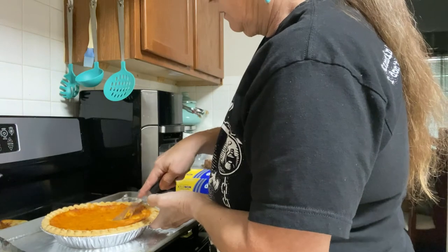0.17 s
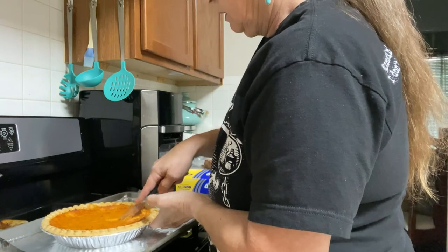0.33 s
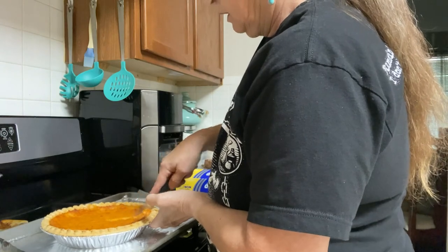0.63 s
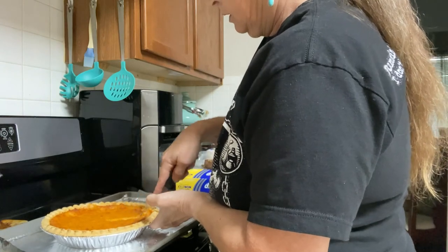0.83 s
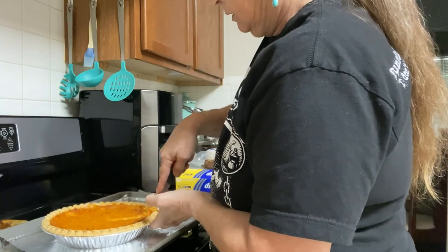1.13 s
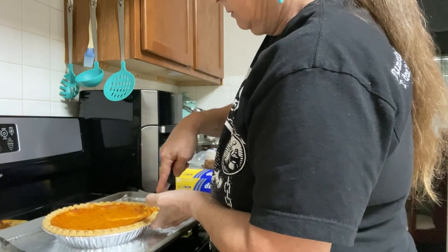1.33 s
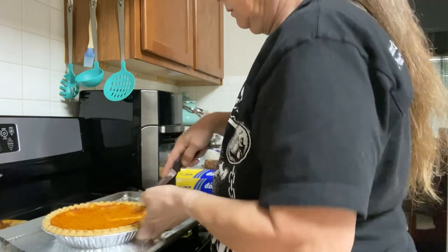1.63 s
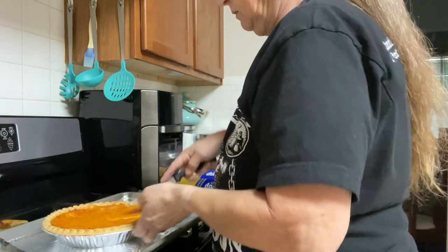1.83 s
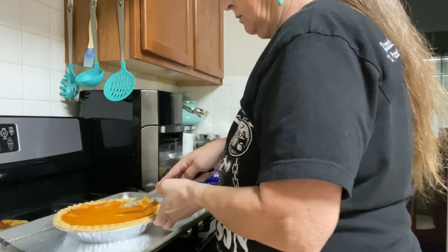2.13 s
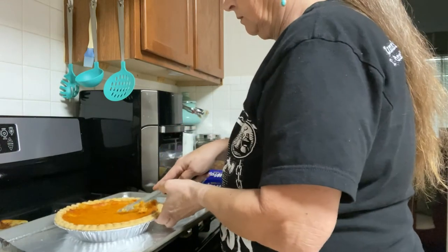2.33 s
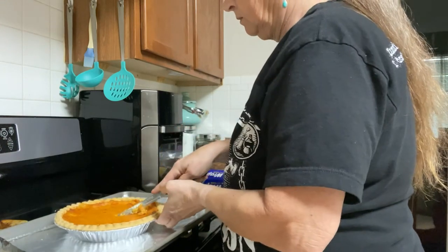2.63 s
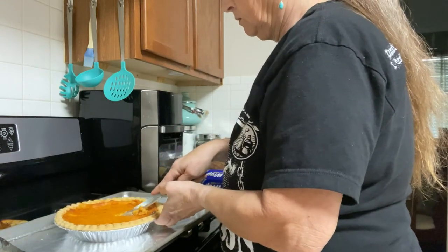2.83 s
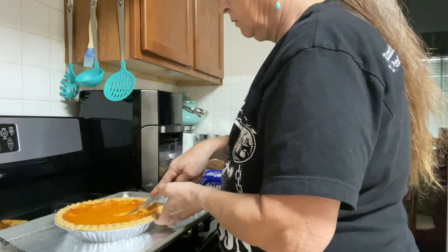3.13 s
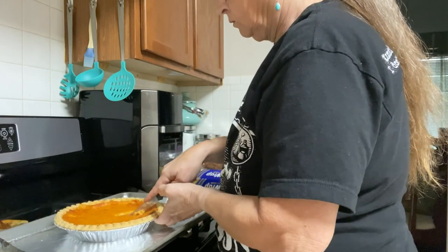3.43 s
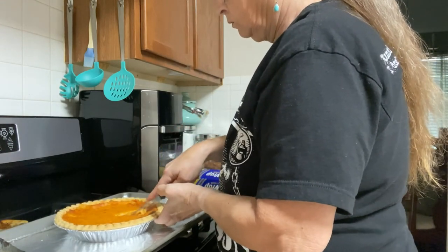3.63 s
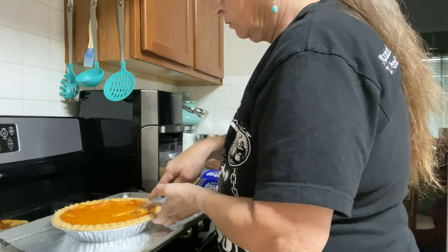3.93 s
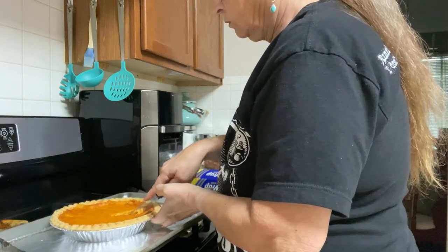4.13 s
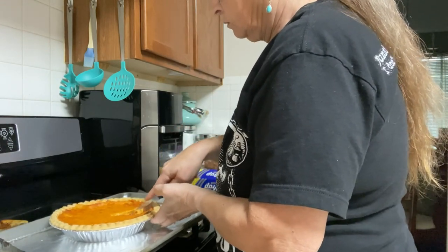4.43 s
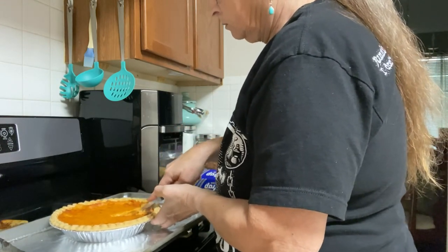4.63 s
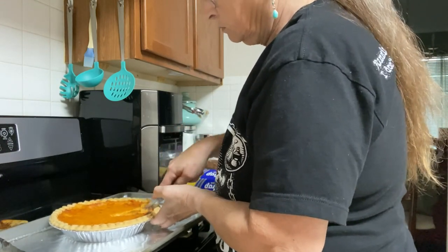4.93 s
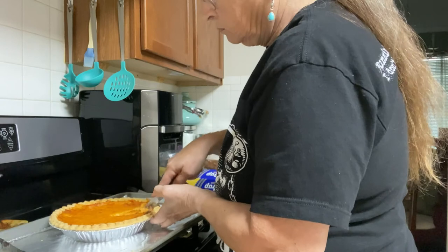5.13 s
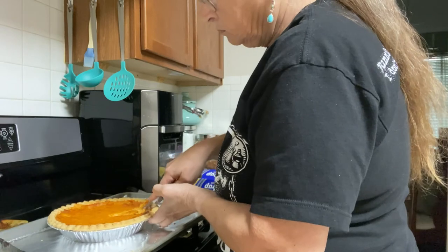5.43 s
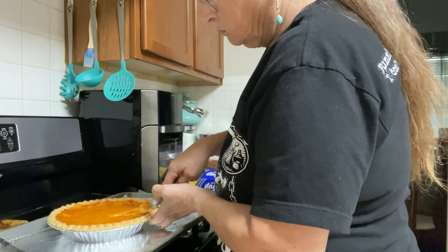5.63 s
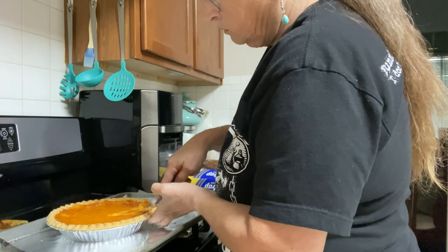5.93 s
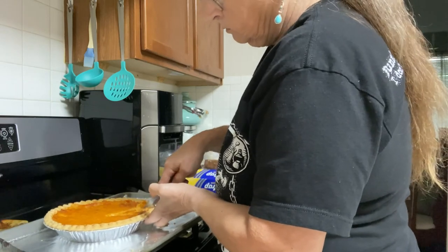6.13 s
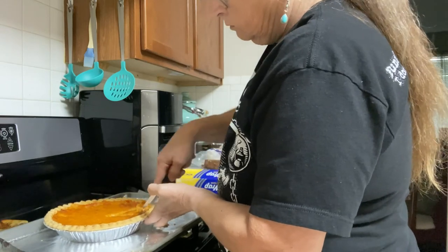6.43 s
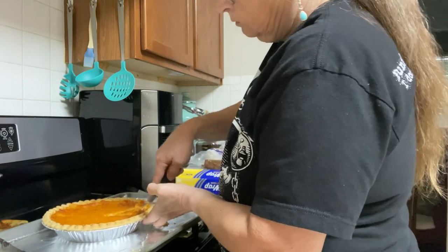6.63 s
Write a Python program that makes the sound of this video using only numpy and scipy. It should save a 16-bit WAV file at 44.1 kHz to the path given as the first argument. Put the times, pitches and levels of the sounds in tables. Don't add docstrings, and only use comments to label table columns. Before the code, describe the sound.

Close in a small hard-walled kitchen, a knife works through pie crust in a thin foil tin. Faint ticks give way to taps, then a busy crackling scrape near one and a half seconds. After a quieter stretch, separate knocks return, growing into the loudest cluster of snaps, pings and hollow pan thuds between five and six seconds. The tray bumps below; soft hum and hiss remain. Stereo phone at arm's length.

```python
import sys
import numpy as np
from scipy import signal
from scipy.fft import rfft, irfft
from scipy.io import wavfile
from scipy.ndimage import uniform_filter1d

SR = 44100
rng = np.random.default_rng(int(sys.argv[2]) if len(sys.argv) > 2 else 0)


def gain_from_db(level_db):
    decades = np.asarray(level_db, float) / 20
    return 10 ** decades


def unload_wav(signal):
    wavfile.write(
        sys.argv[1],
        SR,
        np.round(np.clip(np.atleast_2d(signal).T, -1, 1) * 32767).astype(np.int16),
    )


N = 299356

# multiple of the pitch [ratio], level/dB
DENT_OVERTONES = [(0.721, -14.5), (0.999, 0), (1.37, -9.5), (1.83, -15.5)]


def noise(*shape):
    return rng.standard_normal(shape)


def unit(x):
    return x / np.sqrt(np.mean(x ** 2))


def read(table, hz):
    f, v = np.transpose(table)
    return np.interp(np.log(hz + 1), np.log(f), v)


def band(x, lo_hz, hi_hz):
    return signal.sosfilt(signal.butter(2, [lo_hz, min(hi_hz, .45 * SR)], "bandpass", fs=SR, output="sos"), x)


def ring(x, modes):
    return sum(gain_from_db(db) / np.sqrt(w) * signal.lfilter(*signal.iirpeak(f, f / w, SR), x) for f, w, db in modes)


def convolve(x, h):
    return signal.fftconvolve(x, h, axes=-1)[..., :N]


def walk(rate):
    k = int(SR / rate)
    return unit(uniform_filter1d(uniform_filter1d(np.repeat(noise(N // k + 1), k), k), k)[:N])


def snaps(spread_db):
    return unit(noise(2, N) * uniform_filter1d(gain_from_db(spread_db * np.minimum(rng.exponential(size=N), 5)), size=12))


def dents(events, overtones, gain_db, rise_s, cycles):
    out, t = np.zeros((2, N)), np.arange(4000) / SR
    for at, db, hz in events:
        i = int(at * SR)
        tone = sum(gain_from_db(d) * np.exp((2j * np.pi - 1 / cycles) * min(k * hz, 15000) * t) for k, d in overtones)
        tone = gain_from_db(db + gain_db) * tone * (1 - np.exp(-t / rise_s))
        out[:, i:i + len(t)] += np.array([tone.imag, tone.real])[:, :N - i]
    return out


def blows():
    # t/s, peak level/dB, pan body/dB, ping f/Hz
    knocks = [(.3171, -62.5, -1.5, 3330), (0.4905, -44.5, -8, 2370), (0.7533, -55.5, -2, 3280),
              (0.7694, -32.5, 2.5, 2050), (0.863, -57, 16, 1670), (0.9114, -58.5, 12, 1530),
              (1.767, -40, 9, 1620), (1.904, -45, 7, 3750), (2.4741, -46.5, 4.5, 1500),
              (3.474, -38.5, 3, 2320), (3.589, -43.5, -2.5, 3760), (3.6852, -53.5, -6, 1480),
              (3.93, -50, 0.5, 2320), (4.038, -45.5, 3, 1380), (4.3161, -28, -17, 1564),
              (4.6703, -56, 15.5, 1560), (4.772, -67, 14, 1800), (5.0578, -26.5, -0.5, 3700),
              (5.162, -54, 13, 1830), (5.1967, -40.5, -5.5, 2270), (5.273, -52, 7.5, 1780),
              (5.4544, -67, -10, 1540), (5.7993, -33.5, -9, 3660), (5.8876, -41.5, 3, 1750),
              (6.041, -43, 2.5, 1740), (6.0467, -36.5, 5, 1850), (6.212, -55.5, 16.5, 2360),
              (6.439, -54, 0, 3100), (6.451, -53.5, 14, 1520)]
    # t/s, peak level/dB, pan body/dB, ping f/Hz
    pops = [(0.0515, -74.5, 18.5, 1730), (.594, -72, 5, 2300), (0.875, -45, -4, 3300),
            (1.3912, -79, -12, 2610), (1.6634, -31, 5.5, 3300), (1.8334, -44, -2, 1500),
            (2.1156, -38.5, -7, 2050), (2.648, -64, 11.5, 1940), (3.2955, -67, -8, 3260),
            (3.65, -54, -7, 2350), (3.9, -78, 23, 1530), (4.2652, -67, -2, 3670), (4.725, -43.5, 7, 2100),
            (4.839, -77, 24, 1490), (5.34, -41, 8.5, 1520), (5.4337, -45.5, 5.5, 1580),
            (5.8447, -40, 7, 3720), (5.951, -48, 13, 4740), (6.702, -66, 10, 2000)]
    # t/s, peak level/dB, pan body/dB, sizzle/dB, ping f/Hz
    ticks = [(0.418, -33.5, 0, -14.5, 1550), (.103, -80, -9, 6, 9300), (.2029, -72, -10, 8.5, 7360),
             (0.248, -82, -19, 19.5, 6800), (0.279, -69, -10, 8, 8800), (1.275, -60.5, 5, -8, 3220),
             (1.476, -63, -11, -9, 3830), (1.5533, -29, 5, -9.5, 2040), (1.621, -49, 13, -1, 1640),
             (1.9194, -35.5, 1, -0.5, 2090), (3.765, -38.5, 1, -11, 1517), (4.308, -48, -16, -5, 7000),
             (4.3148, -34, 7, -2, 7980), (4.816, -75, -13, 6.5, 8650), (4.9476, -51.5, 1, -5, 7840),
             (4.9737, -50.5, -5, -3.5, 1510), (4.9992, -30.5, -2, -5.5, 1520), (5.108, -33, 1.5, -6, 3800),
             (5.4128, -48, -11, -2, 8200), (5.668, -58, -31, 1.5, 4100), (5.747, -26.5, 2.7, -5.5, 3740),
             (6.361, -59.5, 14.5, 6.5, 1550), (6.405, -55, -10, 1, 1980), (6.639, -73, 15, 10.5, 7970)]
    # t/s, peak level/dB, pan body/dB, sizzle/dB, shower length/ms
    crushes = [(.387, -66, -22, -11, 66), (1.4214, -66.5, -16, -10.5, 71), (1.497, -64.5, 6, 2.5, 33),
               (1.5265, -61, 6, 8, 18), (1.605, -45.5, 10, -1, 15.7), (3.3393, -81.5, -6, 10, 28),
               (3.371, -39.5, -5, -8, 14.7), (3.71, -45, 4, -20, 13.7), (4.612, -50, -9, -10, 25),
               (5.6974, -29.5, 1, -16, 10.2), (6.0815, -35, 3, -13.5, 23)]
    taps = [(at, db, body_db, -13, hz, 7.7) for at, db, body_db, hz in knocks]
    taps += [(at, db, body_db, -17, hz, 6.45) for at, db, body_db, hz in pops]
    taps += [(*row, 6.14) for row in ticks]
    taps += [(*row, 4520, ms) for *row, ms in crushes]
    return taps


def tap_showers(taps):
    force, t = np.zeros((3, N)), np.arange(5000) / SR
    for at, db, body_db, sizzle_db, _, ms in taps:
        i = int(at * SR)
        shower = np.exp(-t / (ms / 1000)) * (1 - np.exp(-t / 0.0018))
        late = shower ** 0.62 * (1 - np.exp(-t / 0.0052))
        body, sizzle = gain_from_db(body_db - 1.0) * late, gain_from_db(sizzle_db + 5.5) * shower ** 1.25
        force[:, i:i + len(t)] += (gain_from_db(db - 2.5) * np.array([shower, body, sizzle]))[:, :N - i]
    return force


def dent_pings(taps):
    pings, t = np.zeros((2, N)), np.arange(5000) / SR
    ring_s, ping_db = 0.0045, -8
    weight = np.array([[1], [.45], [.45], [.45]])
    for at, db, _, _, hz, _ in taps:
        i = int(at * SR)
        tones = np.vstack([[[hz]], 1300 * 4.2 ** rng.random((3, 1))])
        phase = rng.random((2, 4, 1))
        chord = (weight * np.sin(2 * np.pi * (tones * t + phase))).sum(axis=1)
        pings[:, i:i + len(t)] += gain_from_db(db + ping_db) * (np.exp(-t / ring_s) * chord)[:, :N - i]
    return pings


def swell(t, start, hold, rise_db_s, fall_db_s):
    return gain_from_db(-rise_db_s * np.clip(start - t, 0, 1) - fall_db_s * np.clip(t - start - hold, 0, 1))


def contact():
    # start t/s, hold/s, rustle level/dB, pan body/dB, sizzle/dB
    slides = [(1.41, .05, -82, -7, -5), (1.49, .04, -67.5, -1, -10), (1.57, 0.083, -56, -25, 4),
              (1.94, 0.011, -47, -3.5, -12), (1.99, 0.093, -55, 0, -3), (2.09, 0.1, -56, 2, 0),
              (2.2, 0.095, -61.5, 1, -4.5), (2.42, 0.03, -81, 7, 0), (2.995, 0.014, -103, -7, 14),
              (.29, 0.028, -97, -5, 10), (3.32, 0.045, -81, -7, -23), (3.44, .02, -70, -6, -5),
              (3.76, 0.0055, -56.5, 0.5, -2), (4.09, 0.0038, -61.5, 6, -1), (4.33, 0.082, -61.5, -0.5, -6),
              (4.5, 0.067, -80.5, 1, 2), (5.21, 0.036, -73, -2, 1), (5.28, 0.11, -67, 0.5, -12),
              (5.42, 0.095, -71.5, 8.5, 3.5), (5.55, 0.013, -79, 16, 3), (6.22, 0.028, -69, 2.5, -2.5),
              (6.33, 0.088, -73.5, 8.5, 1.5), (6.5, 0.066, -65, 1, -2.5)]
    # start t/s, hold/s, rustle level/dB, pan body/dB, sizzle/dB
    presses = [(.004, 0.0096, -81, 9.5, -6), (.055, 0.019, -90, 2, -18), (2.5, 0.031, -94, -2, -24),
               (3.1, .02, -100, -13, -6), (3.17, .02, -101, -10, 0), (.65, 0.03, -90, 6, -4),
               (.31, .01, -87, 3, -3), (.43, 0.12, -70.5, 14.5, -15), (.54, 0.12, -70, 8, -4.5),
               (.79, 0.056, -73, 6.5, -1), (.87, 0.078, -69, 5, -13.5), (.99, 0.044, -85, 14.5, 5),
               (1.29, .01, -92, 2.9, -9), (1.71, 0.012, -54, 3.5, -4.5), (1.8, 0.28, -70.5, 12, 7),
               (2.66, 0.0098, -104, -13, 4), (3.56, 0.16, -82, 20.5, -5), (3.9, 0.13, -78.5, 12.5, -1),
               (4.05, 0.0096, -66, -5.5, -20), (4.64, 0.038, -70.5, 13.5, -4), (4.74, 0.04, -86, 23, 6),
               (4.86, 0.078, -91, 21.5, 1), (5.0, 0.017, -67.5, 11.5, -12), (5.11, 0.0088, -66.5, 18, -14),
               (5.7, 0.063, -66, 14.5, -15), (5.85, 0.056, -71, 15.5, 5.5), (5.95, 0.043, -69, 8, -4.5),
               (6.03, 0.12, -64.5, 5.5, 1), (6.47, 0.025, -69.5, 11, 1), (6.655, .02, -81, 12, 3),
               (6.71, 0.014, -73.5, 6.8, -2)]
    # start t/s, hold/s, level/dB
    shoves = [(0.006, 0.02, -55), (0.452, 0.032, -42.5), (0.54, 0.066, -54.5), (0.795, 0.022, -48.5),
              (1.295, 0.008, -71), (1.587, 0.019, -48.5), (1.712, 0.067, -45), (1.937, 0.04, -46),
              (2.032, 0.12, -54.5), (2.4, 0.021, -58), (2.726, 0.027, -66), (2.858, .01, -84),
              (3.398, .01, -54), (3.498, 0.0084, -44), (3.627, 0.17, -50.5), (3.966, 0.13, -52),
              (4.252, 0.0063, -55), (4.373, 0.019, -55), (4.695, 0.015, -49.5), (5.007, 0.045, -49.5),
              (5.114, 0.011, -39), (5.24, 0.27, -54), (5.712, 0.022, -48), (5.76, 0.018, -39.5),
              (5.867, 0.2, -48), (6.103, 0.014, -38), (6.244, 0.12, -60), (6.471, 0.028, -45)]
    tray_idle_db, step_s = -64, 0.001
    t = np.arange(0, N / SR, step_s)
    power = np.zeros((4, len(t)))
    for moves, rise_db_s, fall_db_s in (slides, 299, 210), (presses, 596, 182):
        for at, hold, db, body_db, sizzle_db in moves:
            level = gain_from_db(db + np.array([[0], [body_db], [sizzle_db]]))
            power[:3] += (level * swell(t, at, hold, rise_db_s, fall_db_s)) ** 2
    for at, hold, db in shoves:
        power[3] += (gain_from_db(db) * swell(t, at, hold, 265, 106)) ** 2
    power[3] += gain_from_db(tray_idle_db) ** 2
    return np.array([np.interp(np.arange(N) / SR, t, np.sqrt(p)) for p in power])


def crackles():
    per_s, decay_s = 90, 0.0022
    kicks = (rng.random(N) < per_s / SR) * rng.exponential(size=N)
    return 1 + signal.lfilter([1], [1, -np.exp(-1 / (decay_s * SR))], kicks)


def tin(drag, taps):
    # f/Hz, width/Hz, level/dB
    pan = [(482, 64, -7.5), (562, 51, -1.5), (627, 25, -15.5), (736, 33, -13.5), (1040, 240, -6.5),
           (1431, 180, -5), (1890, 29, -10)]
    unsteady_hand = gain_from_db(np.array([2.1 * walk(30), 2.1 * walk(20), 1.5 * walk(40)]))
    force = drag * unsteady_hand * crackles() ** np.array([[1], [.7], [.6]]) + tap_showers(taps)
    grit = snaps(spread_db=5.0)

    def crease(x):
        return band(band(x, 900, 6460), 1180, 6760)

    def bottom(x):
        return 0.88 * band(x, 500, 2196) + 17 * ring(band(x, 555, 1830), pan)

    def rim(x):
        return band(band(x, 5670, 11700), 3270, 11500) + 0.26 * band(x, 10400, 17000)

    return sum(part(drive * grit) / np.std(part(grit[:, :SR]))
               for drive, part in zip(force, (crease, bottom, rim)))


def tip_clicks():
    # t/s, peak level/dB, f/Hz
    sharp = [(0.2054, -67, 7520), (0.25, -47, 7300), (0.281, -59, 8500), (0.4903, -35.5, 2360),
             (0.7542, -46, 3100), (1.477, -41, 3770), (1.497, -49, 6740), (1.529, -35, 8800),
             (1.6641, -39, 3370), (1.9057, -35, 2950), (2.4748, -41, 3420), (2.6484, -52, 3470),
             (2.9931, -54, 8200), (3.0994, -69, 5980), (3.1794, -76, 3340), (3.3724, -29, 7900),
             (.537, -44, 6500), (1.767, -32, 1750), (3.5882, -45, 3600), (4.7262, -46, 2100),
             (4.8164, -61, 2030), (4.948, -49, 7760), (5.197, -50, 2200), (5.6421, -53, 3320),
             (5.6675, -41, 3870), (5.9524, -50, 4600), (5.7995, -36, 3750), (5.845, -43, 3720),
             (6.083, -40, 3700), (6.0476, -32.5, 2200), (6.3609, -50, 8300), (6.4063, -42, 7500),
             (6.4383, -45, 3110), (6.4524, -45, 3170), (6.4754, -40, 2340), (6.6388, -49, 8130)]
    # multiple of the pitch [ratio], level/dB
    click_overtones = [(.3, -17), (.55, -12), (.8, -5), (1, 6), (1.3, 6), (1.7, -9)]
    return dents(sharp, click_overtones, gain_db=-6, rise_s=.0002, cycles=2.5)


def bottom_thuds():
    # t/s, peak level/dB, f/Hz
    thuds = [(0.419, -41, 1160), (0.454, -46, 651), (0.499, -39.5, 558), (0.519, -52, 504),
             (0.589, -46, 910), (0.784, -35.5, 556), (0.878, -46, 472), (0.909, -53, 472),
             (1.027, -49, 540), (1.56, -34, 1175), (1.571, -39.5, 564), (1.613, -30, 1070),
             (1.625, -34, 580), (1.668, -35, 997), (1.668, -38, 567), (1.699, -42, 1050),
             (1.719, -41, 1049), (1.767, -47, 570), (1.834, -40, 1354), (2.019, -44, 563),
             (2.048, -60, 549), (2.074, -54, 640), (2.097, -55, 563), (2.324, -46.5, 754),
             (3.477, -40, 755), (3.591, -55, 560), (3.622, -43.5, 576), (3.714, -37.5, 767),
             (3.861, -43, 1156), (3.886, -49, 510), (4.594, -55, 562), (4.622, -45, 614), (4.677, -49, 570),
             (4.699, -42, 854), (4.73, -49, 827), (4.754, -49, 646), (4.849, -47, 485), (4.978, -43, 1480),
             (5.079, -30.5, 560), (5.129, -34, 541), (5.273, -61, 755), (5.295, -40, 1370),
             (5.31, -51, 494), (5.444, -40, 1356), (5.497, -59, 585), (5.703, -35.5, 638),
             (5.719, -26.5, 561.5), (5.734, -38, 780), (5.779, -38, 456), (5.809, -32.5, 545),
             (5.873, -41, 512), (5.952, -33, 1300), (6.042, -32, 1100), (6.089, -31, 557),
             (6.109, -35, 590), (6.143, -39, 635), (6.236, -43, 513), (6.448, -41, 500), (6.469, -38, 582),
             (6.489, -37.5, 605),
             (0.056, -56, 560), (.062, -62, 1270), (0.101, -59, 427), (0.179, -72, 610), (0.219, -75, 510),
              (0.315, -53, 570), (2.482, -46, 560), (2.519, -47, 1023), (2.62, -53, 592), (2.663, -56, 540),
              (2.67, -64, 1400), (3.7652, -51, 1460), (4.0261, -47, 1420), (4.0396, -53, 1350),
              (5.978, -48, 1480), (1.778, -40, 1500), (1.795, -46, 1700)]
    return dents(thuds, DENT_OVERTONES, gain_db=-.5, rise_s=.004, cycles=6)


def tray(drive):
    # f/Hz, width/Hz, level/dB
    tray_modes = [(61.7, 31.5, 3), (102.8, 7.7, -8.5), (170, 10, -8), (214.8, 25.6, -1), (274, 29, -25)]
    # t/s, peak level/dB, f/Hz
    bumps = [(0.147, -41.5, 140.4), (0.329, -52, 123), (0.43, -37, 77), (0.775, -54, 119),
             (0.872, -39.5, 122), (0.931, -55, 110), (1.277, -47, 163), (1.559, -31.5, 272),
             (3.481, -52, 72), (4.359, -52, 53.8), (4.73, -32.5, 223), (5.081, -52, 190), (5.094, -41, 68),
             (5.756, -50, 51.1), (5.762, -29, 171)]
    waver = gain_from_db(-2.0 + 1.64 * walk(18))
    rumble = gain_from_db(-2.0) * drive * waver * unit(ring(band(noise(2, N), 34, 366), tray_modes))
    return rumble + dents(bumps, DENT_OVERTONES, gain_db=-7, rise_s=0.01, cycles=4.2)


def kitchen(x):
    # f/Hz, T60/s
    room_t60 = [(300, 0.58), (1500, 0.44), (5000, 0.3), (12000, 0.15)]
    t = np.arange(SR // 2) / SR
    tail = 0
    for hz in 250 * 2. ** np.arange(7):
        octave = band(noise(2, len(t)), hz / np.sqrt(2), hz * np.sqrt(2))
        tail = tail + octave * 1000 ** (-t / read(room_t60, hz))
    tail = tail * (1 - np.exp(-t / 0.00058))
    return convolve(x, tail / np.sqrt(np.sum(tail ** 2) / 2))


def background():
    # f/Hz, density/dB per Hz
    air_db = [(25, -112), (45, -85), (150, -100), (300, -99.5), (550, -105), (900, -120), (1500, -131),
              (2500, -128), (4000, -124.5), (5300, -124.5), (6500, -128.5), (8000, -132.5), (13000, -129.5),
              (16000, -138)]
    # f/Hz, width/Hz, level/dB
    hum_modes = [(54.3, 2.3, -67), (129.3, 18.3, -61), (168.46, 1.75, -67), (226, 130, -81.5)]
    # f/Hz, width/Hz, level/dB
    whine = (3700, 90, -96)
    hz = np.fft.rfftfreq(N, 1 / SR)
    air = rfft(noise(2, N)) * gain_from_db(read(air_db, hz)) * np.sqrt(SR / 2)
    octave = np.log2(hz + 1)
    swell_db = 1.6 * walk(5)
    hiss = 0
    for mid in (8, 10, 12, 14):
        away = np.clip(octave - mid, -2 if mid > 8 else 0, 2 if mid < 14 else 0)
        share = np.cos(np.pi / 4 * away) ** 2
        hiss = hiss + irfft(air * share, N) * gain_from_db(swell_db + 2.2 * walk(14))
    hum = sum(gain_from_db(db + 2.1 * walk(9)) * unit(ring(noise(2, N), [(f, width, 0)]))
              for f, width, db in hum_modes + [whine])
    return hiss + hum


def scene():
    taps, drag = blows(), contact()
    foil = tin(drag[:3], taps) + bottom_thuds()
    bright = dent_pings(taps) + tip_clicks()
    room = gain_from_db(-4.5) * kitchen(foil + gain_from_db(-6) * bright)
    return foil + bright + room + tray(drag[3]) + background()


def roll_off(x):
    return signal.sosfilt(signal.butter(12, 16480, fs=SR, output="sos"), x)


def record(dry):
    # f/Hz, likeness [0-1]
    likeness = [(150, 0.89), (300, 0.69), (600, 0.062), (1600, 0.64), (2600, 0.095), (4500, 0.88),
                (6000, 0.34), (7200, 0.81), (16000, 0.039)]
    # f/Hz, level/dB
    right_db = [(60, -3), (250, -0.4), (1000, -0.3), (3000, 2), (4200, -1.2), (6000, -0.5), (7500, 6.5),
                (16000, -0.5)]
    # f/Hz, phase [half turns]
    lag = [(0, 0), (400, 0), (900, -.35), (4300, -.5), (5280, -1), (21000, -7.01)]
    # from f/Hz, to f/Hz
    sum_gaps = [(9650, 11000), (14800, 22000)]
    # from f/Hz, to f/Hz
    difference_gaps = [(7600, 8250), (12400, 13750), (15500, 22000)]
    hz = np.fft.rfftfreq(N, 1 / SR)
    low_cut = 1 / np.sqrt(1 + (42 / (hz + 1)) ** 8)
    top_cut = (hz < 16500) * gain_from_db(-16 * (hz > 15400))
    left, other = rfft(dry) * top_cut * low_cut
    like = np.clip(read(likeness, hz), 0, .999)
    turn = np.exp(1j * np.pi * np.interp(hz, *np.transpose(lag)))
    right = gain_from_db(read(right_db, hz)) * (like * turn * left + np.sqrt(1 - like ** 2) * other)
    mid, side = (left + right) / 2, (left - right) / 2
    for part, gaps in (mid, sum_gaps), (side, difference_gaps):
        for lo, hi in gaps:
            part *= gain_from_db(-17 * uniform_filter1d(1. * (hz > lo) * (hz < hi), size=2500))
    return roll_off(irfft(np.array([mid + side, mid - side]), N))


dry = scene()
out = record(dry)
unload_wav(out)
```